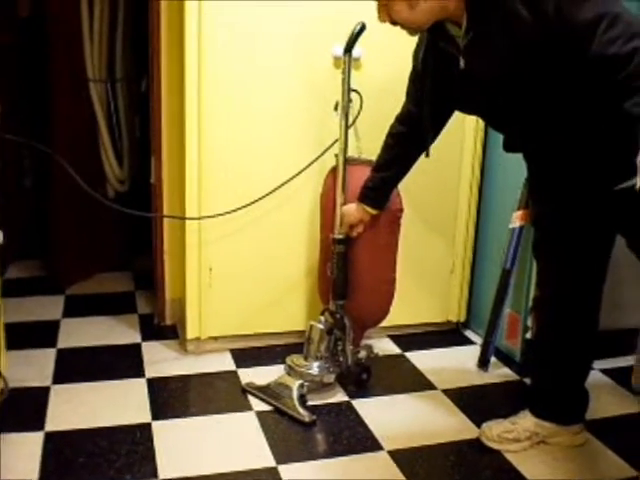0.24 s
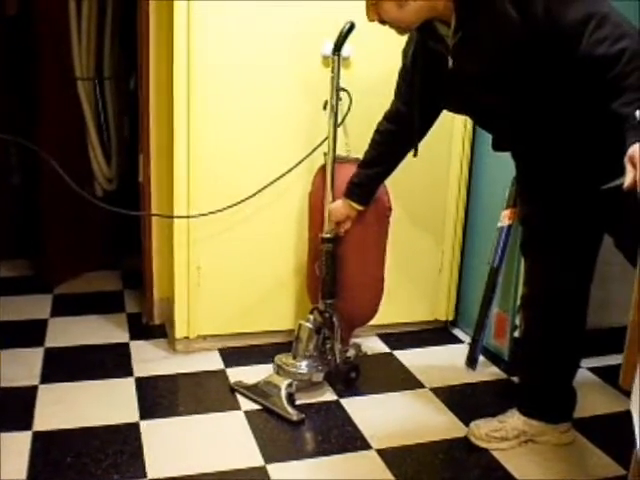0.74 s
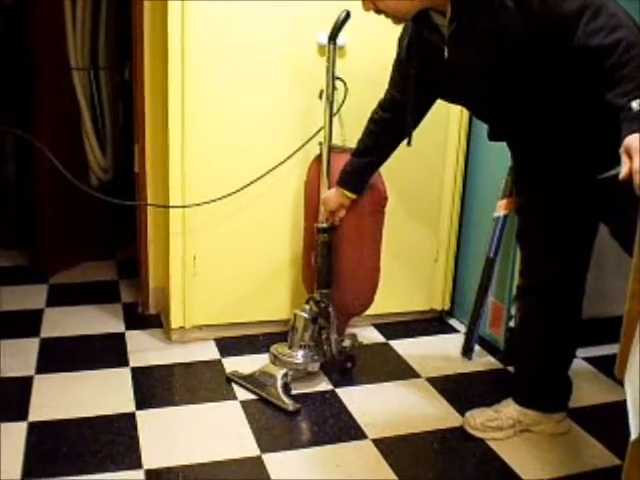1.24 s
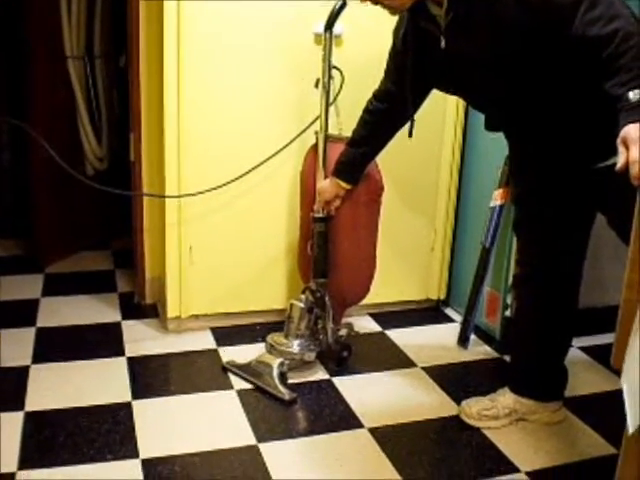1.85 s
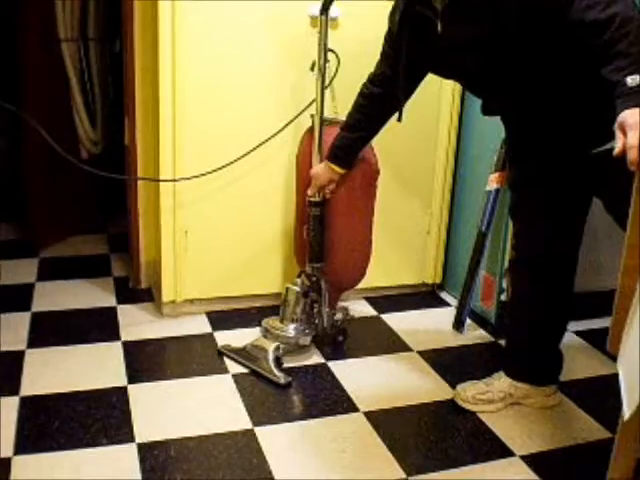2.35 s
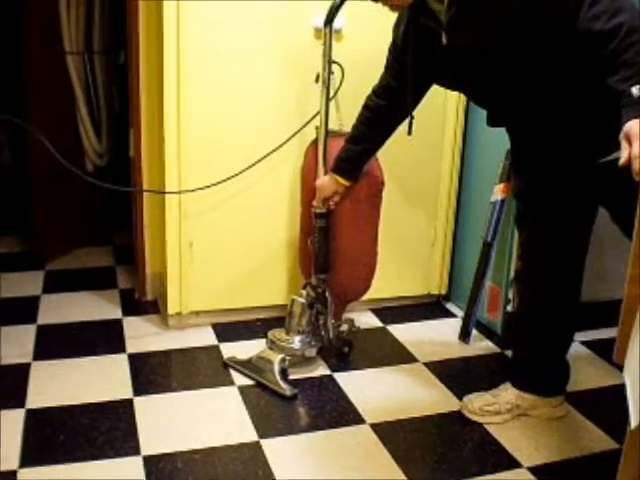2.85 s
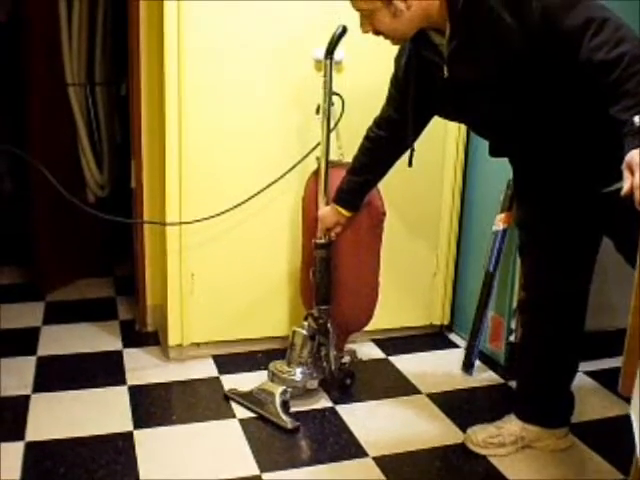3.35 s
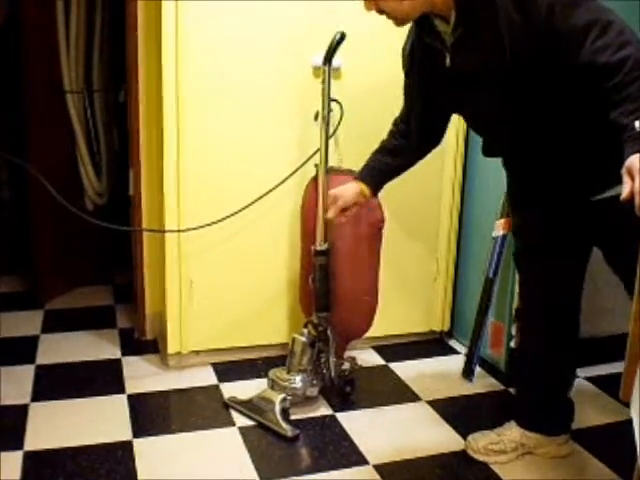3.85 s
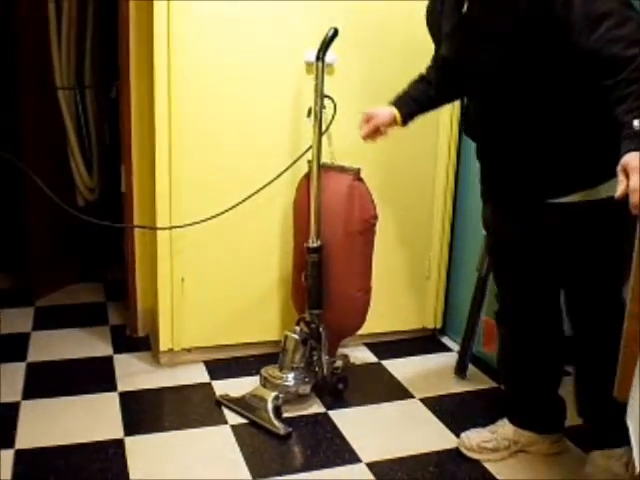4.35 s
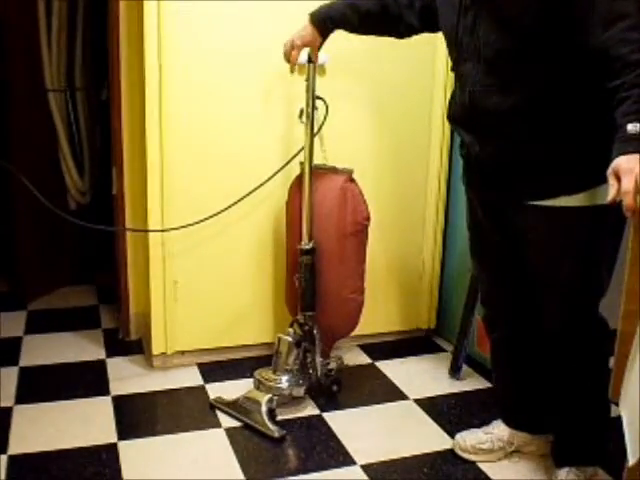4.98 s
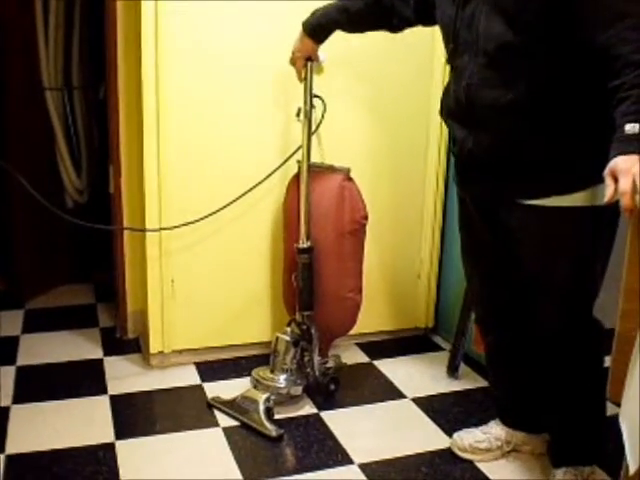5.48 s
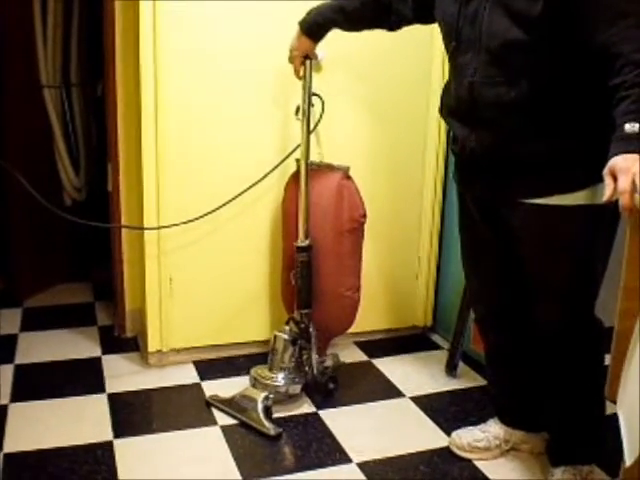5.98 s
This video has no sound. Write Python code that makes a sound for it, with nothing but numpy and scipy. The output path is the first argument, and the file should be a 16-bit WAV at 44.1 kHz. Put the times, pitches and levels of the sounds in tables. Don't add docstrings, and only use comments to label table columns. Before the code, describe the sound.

Steady vacuum motor noise fills a small reflective room: a nasal whine with thinner singing tones above, over a coarse roar and nozzle hiss. Early airflow surges make it flutter. The pitch glides down soon after the start and again around the middle, ending lower and weaker. Two small handle knocks come late, nearly buried. The sound is mono, with little treble and crunchy overload.

```python
import sys
import numpy as np
from scipy import signal
from scipy.fft import rfft, irfft, next_fast_len
from scipy.io import wavfile
from scipy.ndimage import map_coordinates

SR = 44100
rng = np.random.default_rng(int(sys.argv[2]) if len(sys.argv) > 2 else 0)


def wrap_up_sound(samples):
    columns = np.atleast_2d(samples).T
    tamed = np.clip(columns, -1, 1)
    steps = np.round(tamed * 32767).astype(np.int16)
    wavfile.write(sys.argv[1], SR, steps)


def field_ratio(decibels):
    return 10 ** (np.asarray(decibels, dtype=float) / 20)


N = 274302
MAINS_HZ = 60
FREE_SHAFT_HZ = 174.36


def unit(x):
    return x / np.sqrt(np.mean(x ** 2) + 1e-20)


def wobble(rate_hz):
    coarse = np.arange(0, N + 32, 32)
    knots = rng.standard_normal(int(N * rate_hz / SR) + 4)
    return np.interp(np.arange(N), coarse, map_coordinates(knots, [coarse * rate_hz / SR]))


def filtered(x, response):
    m = next_fast_len(N + SR // 2)
    return irfft(rfft(x, m) * response(np.fft.rfftfreq(m, 1 / SR)), m)[:N]


# t/s, shaft rate lost/Hz, time constant/s
LOADS = [
    (.281, 21.09, .786),
    (3.2, 18.26, 1.134),
]


def shaft():
    t = np.arange(N) / SR
    return FREE_SHAFT_HZ - sum(loss * (1 - np.exp(-np.maximum(t - s, 0) / lag)) for s, loss, lag in LOADS)


# t/s, level/dB
SURGES = [(.05, 2.5), (.17, 3), (.275, 4), (.365, 3), (.45, 1.5), (.51, 2.5), (.6, 1.5), (.65, 1.2),
          (.81, 4), (.95, -2.5), (1.015, 4.5), (1.06, 3.5), (1.16, 4.5), (1.24, 4), (1.35, -2), (1.46, 3),
          (1.52, 3), (1.585, 4), (1.661, 2.5), (1.71, -2.5), (1.8, -3.5), (1.965, -3), (2.07, 1.5),
          (2.235, -2.5), (2.27, 1.5), (2.42, 1.5), (2.66, -3), (2.8, -2.5), (3.495, 2.5), (3.565, 2)]


def surges():
    t = np.arange(N) / SR
    half_length_s = 0.014
    return sum(db * np.exp(-((t - s) / half_length_s) ** 2) for s, db in SURGES)


def standing_db(waves, hz):
    power = sum((field_ratio(top_db) / (1 + (2 * (hz - c) / w) ** 2)) ** 2 for c, w, top_db in waves)
    return 10 * np.log10(power)


def tone(phase, level_db, flutter_db, blur_rad):
    size = field_ratio(level_db + np.clip(flutter_db, 0, 3) * wobble(14))
    return np.sqrt(2) * size * np.sin(phase + blur_rad * wobble(25) + rng.uniform(0, 2 * np.pi))


# f/Hz, width/Hz, peak tone level/dB
BLADE_WAVES = [(957, 30, -37), (992, 28, -33), (1017.7, 13, -27.5), (1044, 12, -22), (1073.2, 25.8, -15),
               (1086.5, 17, -20), (1102, 7, -24.5), (1125, 26, -24.5), (1160.7, 31.4, -17.5),
               (1184, 10, -22), (1199, 16, -19.5), (1222, 9, -23)]


def blade_whine(turn, shaft_hz, surge_db):
    level_db = standing_db(BLADE_WAVES, 7 * shaft_hz) + 1.2 * surge_db
    return tone(7 * turn, level_db, flutter_db=0.58, blur_rad=0.09)


# f/Hz, width/Hz, peak tone level/dB
ARMATURE_WAVES = [(1268, 20, -31), (1526, 55, -36.5), (1642, 56, -33.5), (1703.5, 36, -36),
                  (1760, 30, -36.5), (1833, 37, -39.5), (1910, 40, -41)]
# shaft order, torque pulses added, level over standing waves/dB, flutter/dB, blur/rad
ARMATURE_TONES = [(11, 0, 0, 1.1, .15), (12, 0, -6.5, 2.5, .3), (14, 0, 2.5, 1, .15), (11, 1, -2, 1.3, .15),
                  (11, -1, -7, 1, .5), (10, -1, -7, 1.5, .2)]


def armature(turn, shaft_hz, torque):
    out = np.zeros(N)
    for order, side, db, flutter_db, blur_rad in ARMATURE_TONES:
        order, side = round(order), round(side)
        level_db = db + standing_db(ARMATURE_WAVES, order * shaft_hz + side * 2 * MAINS_HZ)
        out += tone(order * turn + side * torque, level_db, flutter_db, blur_rad)
    return out


# multiple of shaft rate, level/dB
WEAK_ORDERS = [(4, -54.5), (10, -50), (20, -54), (21, -53), (22, -52), (23, -55.5), (24, -57), (26, -57)]


def weak_orders(turn):
    return sum(tone(order * turn, db, flutter_db=3, blur_rad=0.65) for order, db in WEAK_ORDERS)


def mains_buzz(torque):
    buzz = tone(2 * torque, -55.5, flutter_db=6.0, blur_rad=0.46)
    return buzz + tone(torque, -71, flutter_db=4.0, blur_rad=0.5)


def motor(turn, shaft_hz, surge_db):
    torque = 2 * np.pi * 2 * MAINS_HZ * np.arange(N) / SR
    out = blade_whine(turn, shaft_hz, surge_db) + armature(turn, shaft_hz, torque)
    return out + weak_orders(turn) + mains_buzz(torque)


# f/Hz, width/Hz, level over broad colour/dB (negative in a dip)
HOUSING = [(245, 32, 6), (688, 29, -2.5), (705, 35, 7), (751.4, 16, -3.5), (791.4, 49, 7), (851, 30, 3),
           (945, 44, -3.5), (959, 16, 3), (1017, 11, 3), (1073.4, 24, 8.5), (1183, 36, 5.5), (1260, 27, -1),
           (1354, 16, 5), (1500, 53, 3), (1643, 48, 4.5), (1688, 24, 4.5), (1830, 41, 3.5), (2043, 32, 5),
           (2123, 47, -3.5), (2457, 29, 5), (2784, 59, 5), (3150, 61, 4.5), (3630, 18, 5)]


def colour_db(points, hz):
    f, db = np.transpose(points)
    lift = sum(top_db / (1 + (2 * (hz - c) / w) ** 2) for c, w, top_db in HOUSING)
    return np.interp(np.log(hz + 1), np.log(f), db) + lift


# f/Hz, level/dB per Hz
ROAR = [(60, -64), (118, -35), (203, -19), (280, -16.5), (340, -21), (480, -11), (600, -9), (665, -10.5),
        (730, -4.5), (950, -3), (1400, -6.5), (1900, -11), (2300, -23.5), (3000, -43)]


def roar(speed_db, surge_db, grit):
    noise = rng.standard_normal(N) + grit
    noise = unit(filtered(noise, lambda hz: field_ratio(colour_db(ROAR, hz))))
    since_choke_s = np.maximum(np.arange(N) / SR - LOADS[-1][0], 0)
    choke_db = -2.2 * (1 - np.exp(-since_choke_s / 0.12))
    level_db = -22.5 + 2.0 * speed_db + choke_db + 0.8 * surge_db
    return field_ratio(level_db + 0.36 * wobble(9) + 0.52 * wobble(40)) * noise


# f/Hz, level/dB per Hz
HISS = [(1120, -36), (1900, -2), (2240, -8), (2470, -5), (3240, -4), (3680, -5), (3860, -10), (5020, -46),
        (8490, -120)]


def hiss(turn, speed_db, grit):
    chop = 1 + 0.1 * np.sin(turn)
    noise = rng.standard_normal(N) * chop + grit
    noise = unit(filtered(noise, lambda hz: field_ratio(colour_db(HISS, hz))))
    level_db = -27.6 + 3.4 * speed_db
    return field_ratio(level_db + 0.3 * wobble(10) + 0.5 * wobble(50)) * noise


def air(turn, shaft_hz, surge_db):
    speed_db = 20 * np.log10(shaft_hz / FREE_SHAFT_HZ)
    grit = (rng.random(N) < 40 / SR) * rng.uniform(2, 7, N)
    return roar(speed_db, surge_db, grit) + hiss(turn, speed_db, grit)


def kitchen(x, t60_s, wet_db):
    t = np.arange(SR // 2) / SR
    tail = rng.standard_normal(len(t)) * field_ratio(-60 * t / t60_s)
    mixed = x + field_ratio(wet_db) * signal.fftconvolve(x, tail / np.linalg.norm(tail))[:N]
    return mixed / np.sqrt(1 + field_ratio(wet_db) ** 2)


# t/s, peak level/dB, ring f/Hz, t60/s
KNOCKS = [
    (4.935, -16, 1300, 0.014),
    (5.282, -17, 1075, 0.076),
]


def handle():
    t = np.arange(N) / SR
    out = np.zeros(N)
    for s, db, hz, t60_s in KNOCKS:
        u = np.maximum(t - s, 0)
        out += field_ratio(db - 60 * u / t60_s) * np.sin(2 * np.pi * hz * u) * np.tanh(u * hz)
    return out


def scene():
    shaft_hz, surge_db = shaft(), surges()
    turn = 2 * np.pi * np.cumsum(shaft_hz) / SR
    whine = kitchen(motor(turn, shaft_hz, surge_db), t60_s=0.29, wet_db=-18.0)
    rush = kitchen(air(turn, shaft_hz, surge_db) + handle(), t60_s=0.3, wet_db=-9.5)
    return (whine + rush)[None]


def roll_off(x):
    return signal.sosfilt(signal.butter(12, 15890, fs=SR, output="sos"), x)


def record(dry):
    camera_rate_hz = 8000
    up, down = camera_rate_hz // 100, SR // 100
    slow = signal.resample_poly(np.pad(dry[0], (0, SR // 10), "reflect"), up, down)
    slow = np.clip(slow, -0.267, 0.267)
    full = signal.resample_poly(slow, down, up, window=("kaiser", 12.0))
    full = filtered(full, lambda hz: field_ratio(-75 * np.clip((hz - 3800) / 560, 0, 1) ** 2))
    full = np.clip(full, -0.272, 0.272) - 0.001
    return roll_off(full[None])


dry = scene()
out = record(dry)
wrap_up_sound(out)
```